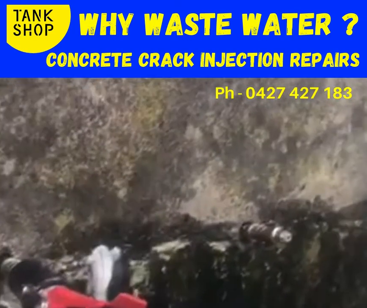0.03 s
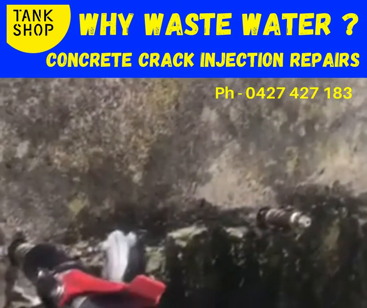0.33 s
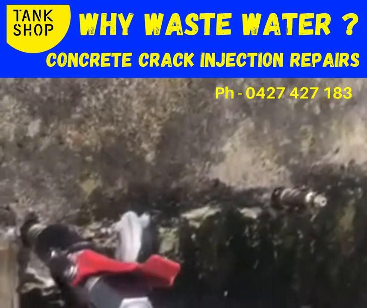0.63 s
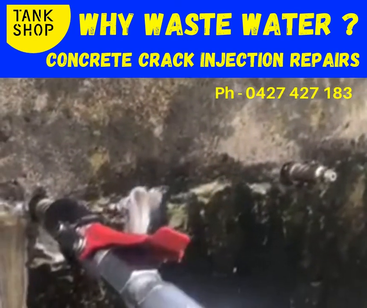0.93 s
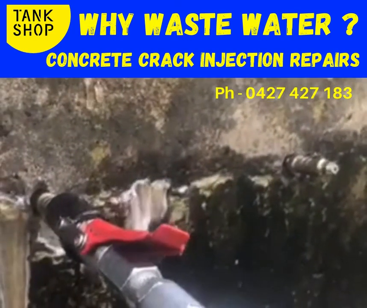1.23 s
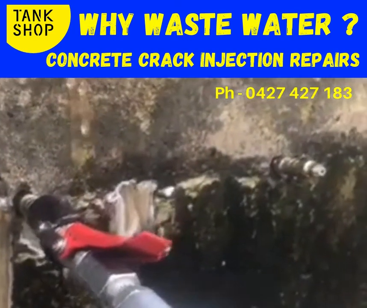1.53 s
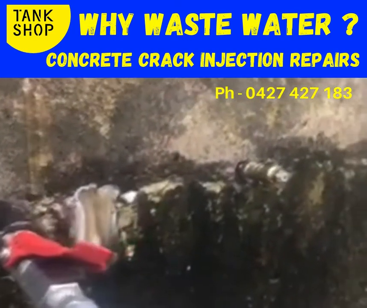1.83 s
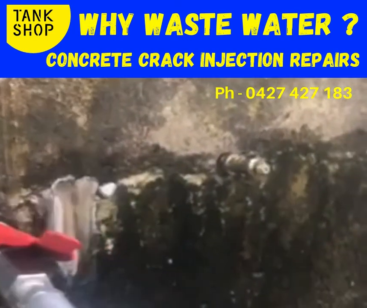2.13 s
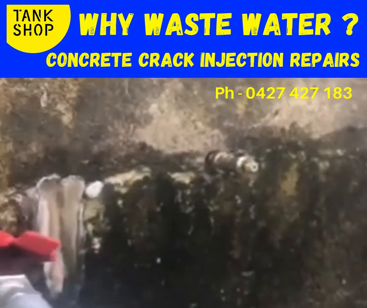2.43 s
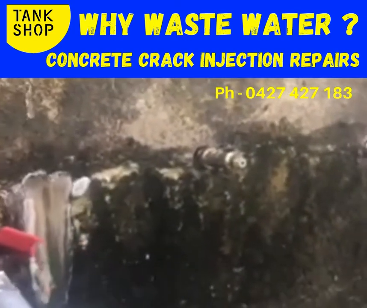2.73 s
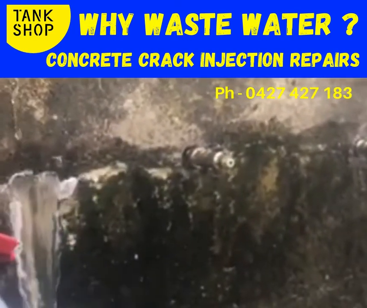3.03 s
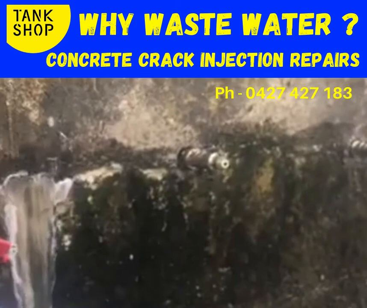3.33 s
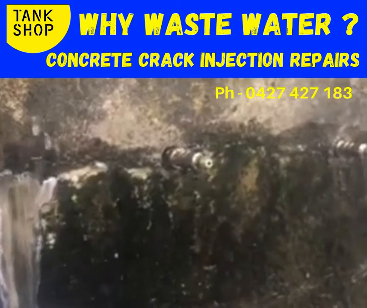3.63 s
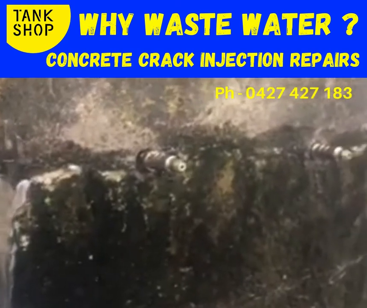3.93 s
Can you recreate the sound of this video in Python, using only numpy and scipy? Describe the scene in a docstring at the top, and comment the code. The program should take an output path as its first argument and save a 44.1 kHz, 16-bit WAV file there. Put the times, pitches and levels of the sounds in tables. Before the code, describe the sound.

A small motor-driven pump runs outdoors by a concrete tank with fast, even metallic clacks. Gears rattle throughout and each stroke hisses and whines briefly, over a low drone, while handling or wind occasionally thumps the microphone.

```python
"""A small motor-driven injection pump runs outdoors by a concrete tank, at nearly seven strokes a second.
Each stroke ends in a metallic clack as bouncing contacts ring the pump body. In the second half of
each turn a valve knocks, the flow hisses and a short whine falls; early on, the piston squeaks.
Gear teeth rattle in the drive housing throughout, over a low drone and a faint steady hiss,
and handling or wind thumps the microphone now and then."""
import sys
import numpy as np
from scipy import signal
from scipy.fft import rfft, irfft
from scipy.io import wavfile

SR = 44100
rng = np.random.default_rng(int(sys.argv[2]) if len(sys.argv) > 2 else 0)


def unload_wav(signal):
    """Save mono or channel-first audio to the path in sys.argv[1] as 16-bit WAV at rate SR, clipped to [-1, 1]."""
    wavfile.write(
        sys.argv[1],
        SR,
        np.round(np.clip(np.atleast_2d(signal).T, -1, 1) * 32767).astype(np.int16),
    )


N = 176400
T = np.arange(N) / SR

# pump strokes: (clack time [s], bright tick [dB], dull knock [dB], whine before the clack [dB])
STROKES = [(-.007, -4.5, 1.5, -17), (.1467, -11.5, -7.5, -19), (.3028, -8, -11, -17),
           (.4594, -11.5, -10, -17), (.6126, -8, -10, -16), (.7632, -13, -11.5, -16),
           (.9135, -13, -7, -18.5), (1.0635, -12.5, -7.5, -17.5), (1.2134, -13, -13.5, -19),
           (1.3641, -12.5, -12, -16.5), (1.5144, -12, -13, -17.5), (1.6646, -9.5, -13.5, -16),
           (1.8141, -10, -6.5, -16), (1.9636, -9.5, -8.5, -15), (2.1135, -11, -11, -19),
           (2.2628, -9, -23, -19), (2.412, -10.5, -10, -15), (2.5605, -9, -17, -16),
           (2.7091, -11.5, -9.5, -16), (2.8581, -10.5, -11, -16.5), (3.0066, -10, -10, -14),
           (3.1545, -10.5, -7, -15.5), (3.3028, -9.5, -9.5, -17.5), (3.4509, -11.5, -6.5, -16.5),
           (3.5984, -10.5, -6.5, -14), (3.7465, -11.5, -4, -15.5), (3.8941, -9.5, -6.5, -14),
           (4.042, -9, -6.5, -16)]


def from_db(db):
    """Decibels to gain."""
    return 10 ** (np.asarray(db) / 20)


def unit_rms(x):
    """Scale to rms 1."""
    return x / np.sqrt(np.mean(x ** 2) + 1e-20)


def colour(x, spectrum):
    """Minimum-phase EQ along a curve of (frequency [Hz], level [dB]); the result has rms 1."""
    hz, db = np.transpose(spectrum)
    grid_hz = np.maximum(np.fft.rfftfreq(N, 1 / SR), 1)
    gain = from_db(np.interp(np.log(grid_hz), np.log(hz), db))
    cepstrum = irfft(np.log(gain), N)
    cepstrum[1:N // 2] *= 2  # folded forward, so nothing rings ahead of a hit
    cepstrum[N // 2 + 1:] = 0
    return unit_rms(irfft(rfft(x) * np.exp(rfft(cepstrum)), N))


def drift(rate_hz):
    """Smooth random wander with rms 1."""
    grid_hz = np.fft.rfftfreq(N, 1 / SR)
    return unit_rms(irfft(rfft(rng.standard_normal(N)) / (1 + (grid_hz / rate_hz) ** 2), N))


def clicks(times, sizes):
    """Single-sample impulses at the given times in seconds."""
    out = np.zeros(N)
    inside = (times >= 0) & (times < (N - 1) / SR)
    np.add.at(out, (times[inside] * SR).astype(int), sizes[inside])
    return out + 1e-18


def ring(x, hz, t60):
    """One resonant mode that dies by 60 dB in t60 seconds."""
    radius, angle = from_db(-60 / (t60 * SR)), 2 * np.pi * hz / SR
    return signal.lfilter([0, np.sin(angle)], [1, -2 * radius * np.cos(angle), radius ** 2], x)


def stroke_load(turn):
    """Envelope of the working stroke, 0-1: it opens in mid-turn and dies away after the clack."""
    opens, attack, release = .53, .026, .21  # turns
    position = turn % 1
    opening = np.clip((position - opens) / attack, 0, 1)
    return np.maximum(opening, np.exp(-position / release))


def air():
    """A faint, steady bed of hiss behind the pump."""
    # tone of the bed: (frequency [Hz], relative level [dB])
    spectrum = [(1500, -13), (2900, 0), (4000, 3), (5200, -0.5), (6600, 0), (7800, -14), (12000, -12),
                (15500, -13.5)]
    return from_db(-41.5) * colour(rng.standard_normal(N), spectrum)


def drone():
    """Low noise swells and ebbs under the pump."""
    # tone of the drone: (frequency [Hz], relative level [dB])
    spectrum = [(15, -13), (25, -11), (36, 1), (52, 2.5), (70, 0.5), (100, -7.5), (130, -9.5), (180, -21.5),
                (320, -21.5), (480, -34.5), (900, -58)]
    # its slow swells: (time [s], level [dB])
    swells = [(0, -28), (.7, -31), (1.3, -28.5), (1.7, -32.5), (2.6, -30), (3.2, -27), (3.52, -25.5),
              (3.75, -27.5), (4, -31)]
    return from_db(np.interp(T, *np.transpose(swells))) * colour(rng.standard_normal(N), spectrum)


def microphone_thumps():
    """Handling or wind bumps the microphone: a few dull cycles that dive in pitch."""
    # bumps: (time [s], relative level [dB], starting pitch [Hz], decay time [s])
    bumps = [(0.046, -21.5, 260, 0.0077), (.114, -23, 253, .006), (0.123, -22, 90, .012),
             (0.58, -14, 190, 0.0094), (0.599, -15, 257, 0.0067), (1.124, -23, 160, .012),
             (1.302, -23, 248, 0.0086), (1.322, -18, 302, 0.0095), (1.394, -22, 182, 0.012),
             (1.421, -20, 200, 0.012), (2.1994, -3, 332, 0.007), (2.821, -20.5, 340, 0.0067),
             (3.048, -24, 314, 0.0099), (3.073, -19.5, 290, .01), (3.163, -23.5, 290, 0.01),
             (3.21, -18.5, 300, 0.0062), (3.527, -13, 86, 0.017), (3.576, -16, 290, 0.0047),
             (3.6175, -7, 342, 0.0042), (3.627, -7, 111, 0.008), (3.728, -5, 90.5, 0.0062),
             (3.784, -24.5, 324, 0.0078)]
    end_hz, dive_s, rise_cycles, gain_db = 65.4, .0082, .56, 6
    out, t = np.zeros(N + SR), np.arange(SR // 10) / SR
    for time, db, start_hz, decay_s in bumps:
        hz = end_hz + (start_hz - end_hz) * np.exp(-(t / dive_s) ** 2)
        tone = np.sin(2 * np.pi * np.cumsum(hz) / SR)
        attack = 1 - np.exp(-(t * start_hz / rise_cycles) ** 2)
        start = int(time * SR)
        out[start:start + len(t)] += from_db(db + gain_db) * attack * np.exp(-t / decay_s) * tone
    return out[:N]


def piston_squeaks():
    """The piston gives thin, unsteady whistles that slide downwards."""
    # squeaks at their peaks: (time [s], level [dB], pitch [Hz])
    squeaks = [(.271, -28, 5140), (.288, -33, 5100), (.413, -34, 5670), (.431, -29, 5170)]
    fall_hz_per_s, width_s, waver_hz = 12000, .0099, 60.5
    waver_cycles = waver_hz * np.cumsum(drift(rate_hz=300)) / SR
    out = np.zeros(N)
    for time, db, hz in squeaks:
        t = T - time
        cycles = (hz - .5 * fall_hz_per_s * t) * t + waver_cycles
        out += from_db(db) * np.exp(-.5 * (t / width_s) ** 2) * np.sin(2 * np.pi * cycles)
    return out


def flow_hiss(turn):
    """Flow hisses through the pump during the working stroke."""
    # whistly tone of the flow: (frequency [Hz], relative level [dB])
    spectrum = [(1200, -8), (1470, 17), (1800, -10.5), (2050, -3), (2380, 11), (2650, -8.5), (2950, 0),
                (3900, -9), (4550, -1.5), (4900, -14), (5100, 4.5), (5350, -6.5), (5700, 1), (6700, -4),
                (7700, -12.5), (10000, -21.5), (11700, -15), (15500, -25.5)]
    return from_db(-29.5) * stroke_load(turn) * colour(rng.standard_normal(N), spectrum)


def gear_rattle(turn):
    """Dense small knocks of the gear teeth ring in the housing, a little harder under load."""
    # resonances of the housing: (frequency [Hz], relative level [dB])
    housing = [(250, -28), (480, -27), (580, -16), (720, -3.5), (940, -3.5), (1060, 2), (1150, -3),
               (1290, -4.5), (1480, 2), (1650, -1), (1850, -9.5), (2020, -16), (2350, -13), (2700, -21),
               (3300, -35.5), (6400, -37.5), (15500, -54)]
    knocks_per_s, spread_db, noise_mix = 1400, 1.5, .73
    teeth_per_turn, tooth_depth = 34, .29
    level_db, load_boost_db = -21, .86
    hits = rng.random(N) < knocks_per_s / SR
    knocks = hits * from_db(spread_db * rng.standard_normal(N)) * rng.choice([-1, 1], N)
    force = unit_rms(knocks) + noise_mix * rng.standard_normal(N)
    meshing = 1 + tooth_depth * np.cos(2 * np.pi * teeth_per_turn * turn)
    return from_db(level_db + load_boost_db * stroke_load(turn)) * colour(force * meshing, housing)


def load_whine(turn):
    """A tone tied to the pump's speed swells and sags in pitch as each stroke takes up its load."""
    # harmonics 1 to 4 of the whine: (relative level [dB])
    harmonics = [0.57, -28, -29, -26]
    cycles_per_turn, sag_hz_per_turn = 235.5, 748.5
    centre, width = .73, .086  # turns
    waver_hz, flutter_db = 10.95, 1.0
    position = turn % 1
    past_centre = position - centre
    turns_per_s = np.gradient(turn) * SR
    hz = cycles_per_turn * turns_per_s - sag_hz_per_turn * past_centre + waver_hz * drift(rate_hz=28.1)
    phase = 2 * np.pi * np.cumsum(hz) / SR
    tone = sum(from_db(db) * np.sin(k * phase) for k, db in enumerate(harmonics, 1))
    stroke_db = np.transpose(STROKES)[3][np.ceil(turn).astype(int)]
    swell = from_db(stroke_db + flutter_db * drift(rate_hz=28)) / (1 + (past_centre / width) ** 2)
    edge_fade = np.sin(np.pi * position) ** .5  # silent at each clack
    return np.sqrt(2) * swell * edge_fade * tone


def bounces(starts, db, pattern):
    """Times and levels of the bouncing contacts of each hit, timed a little differently every time."""
    jitter = .08  # fraction of each delay
    runs = [(starts + delay * (1 + jitter * rng.standard_normal(len(db))), db + level)
            for delay, level in pattern]
    return np.concatenate(runs, axis=1)


def contact_crack(times, db):
    """Each bright contact spits a very short burst of high noise."""
    t60, low_cut_hz = .016, 4000
    decay = from_db(-60 / (t60 * SR))
    envelope = signal.lfilter([1], [1, -decay], clicks(times, from_db(db)))
    low_cut = signal.butter(1, low_cut_hz, "high", fs=SR, output="sos")
    return from_db(-15) * signal.sosfilt(low_cut, envelope * rng.standard_normal(N))


def body_ring(times, db, rolloff_hz):
    """Contacts ring the metal pump body; the duller the contact, the less it stirs the high modes."""
    # modes of the pump body: (frequency [Hz], relative level [dB], t60 [s])
    modes = [(762, -21, 0.043), (930, -13.5, 0.02), (1147, -7, 0.022), (1442, -4.5, 0.028),
             (1777, -5.5, 0.01), (2258, -9.5, 0.024), (2437, -9, 0.024), (2923, -20.5, 0.023),
             (3295, -20.5, 0.027), (4594, -7.5, 0.0064), (5200, -9.5, 0.015), (5770, -11.5, 0.011),
             (6290, -14.5, 0.023), (6950, -10.5, 0.0097), (8540, -20.5, .01), (11570, -25.5, 0.019)]
    spread_db, gain_db = 1.5, 3.5
    out = np.zeros(N)
    for k, (hz, mode_db, t60) in enumerate(modes):
        strike_db = db + mode_db + spread_db * rng.standard_normal(len(times))
        sizes = from_db(strike_db) / (1 + (hz / rolloff_hz) ** 2)
        out += (-1) ** k * ring(clicks(times, sizes), hz, t60)
    return from_db(gain_db) * out


def pump_clacks():
    """Each clack is a bright tick and a dull knock that both bounce; a valve knocks lightly in mid-turn."""
    # bright contacts within one clack: (delay [s], relative level [dB])
    tick_bounces = [(-.0001, 0.5), (.0013, -8), (.0062, -8), (.0085, -11.5), (.013, -12)]
    # dull contacts within one clack: (delay [s], relative level [dB])
    knock_bounces = [(.0012, 4), (.003, 2.5), (.0086, -6)]
    valve_at_turns, valve_lag_s = .57, .001975
    valve_tick_db, valve_knock_db = -17.5, -8.5  # relative to the clack before
    starts, tick_db, knock_db, _ = np.transpose(STROKES)
    valve_times = starts[:-1] + valve_at_turns * np.diff(starts)
    valve_ticks = [valve_times, tick_db[:-1] + valve_tick_db]
    valve_knocks = [valve_times + valve_lag_s, knock_db[:-1] + valve_knock_db]
    ticks = np.hstack([bounces(starts, tick_db, tick_bounces), valve_ticks])
    knocks = np.hstack([bounces(starts, knock_db, knock_bounces), valve_knocks])
    crack = contact_crack(*ticks)
    return crack + body_ring(*ticks, rolloff_hz=12200) + body_ring(*knocks, rolloff_hz=2160)


def scene():
    """Mono mix of pump and background; the strokes pace the rattle, the flow and the whine."""
    clack_times = np.transpose(STROKES)[0]
    turn = np.interp(T, clack_times, np.arange(len(STROKES)))  # one turn from clack to clack
    pump = pump_clacks() + gear_rattle(turn) + flow_hiss(turn) + load_whine(turn) + piston_squeaks()
    return (pump + air() + drone() + microphone_thumps())[None]


def record(dry):
    """Soft saturation rounds the peaks and a steep low-pass takes off the very top."""
    ceiling, cutoff_hz = 1.05, 15600
    high_cut = signal.ellip(10, .1, 80, cutoff_hz, fs=SR, output="sos")
    return signal.sosfilt(high_cut, ceiling * np.tanh(dry / ceiling))


dry = scene()
out = record(dry)
unload_wav(out)
```